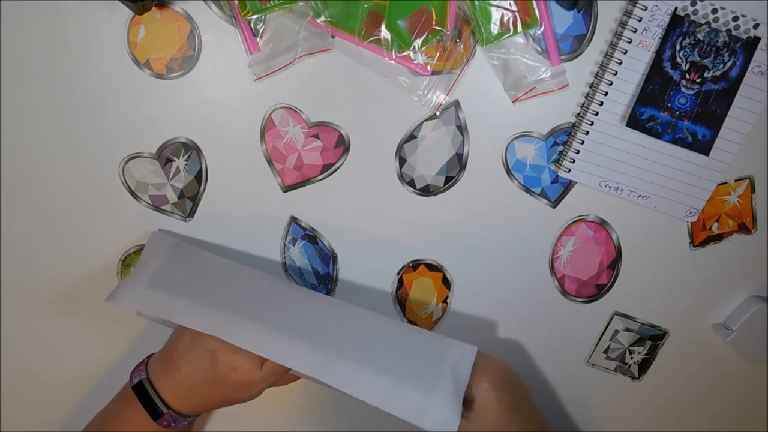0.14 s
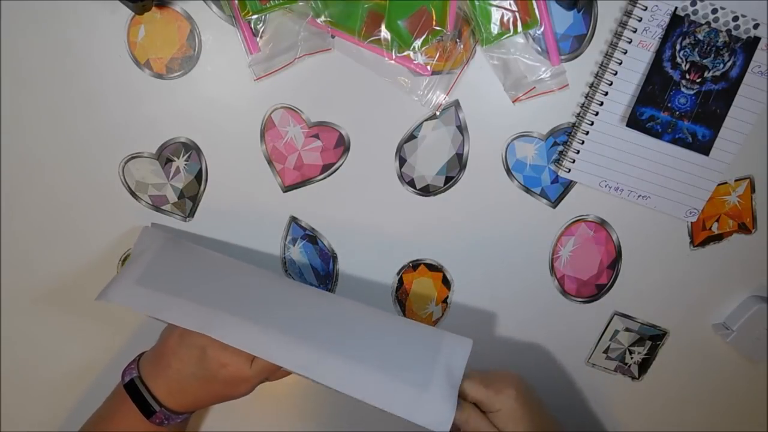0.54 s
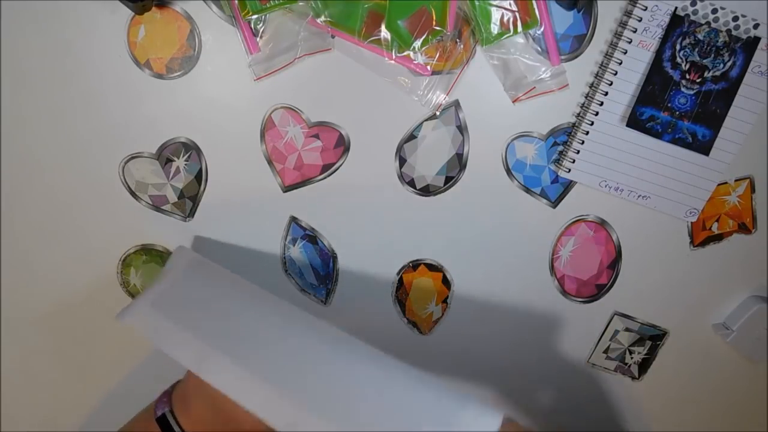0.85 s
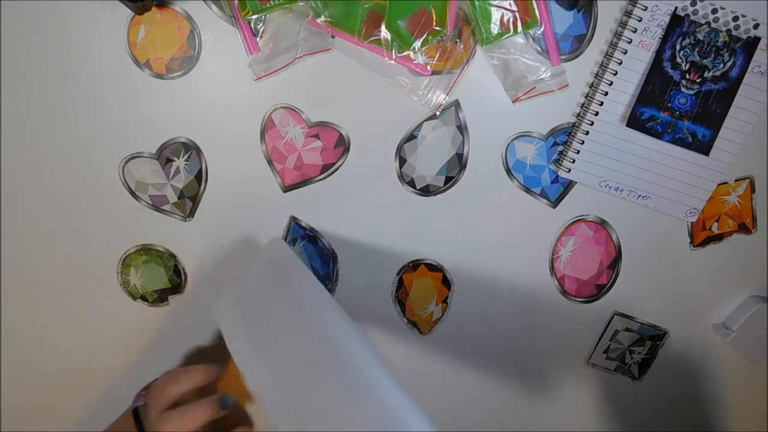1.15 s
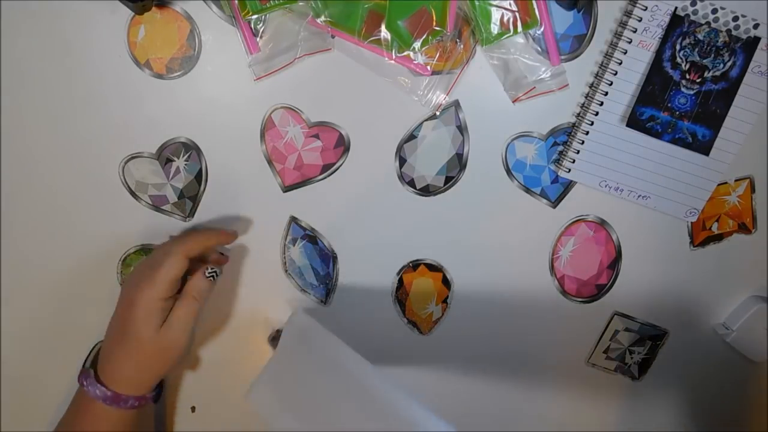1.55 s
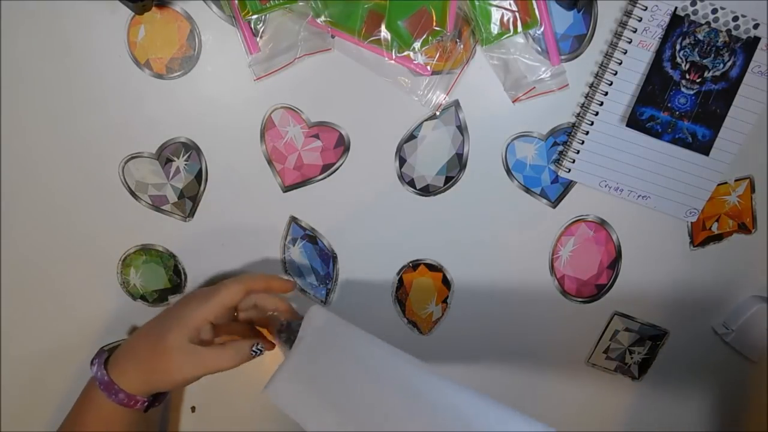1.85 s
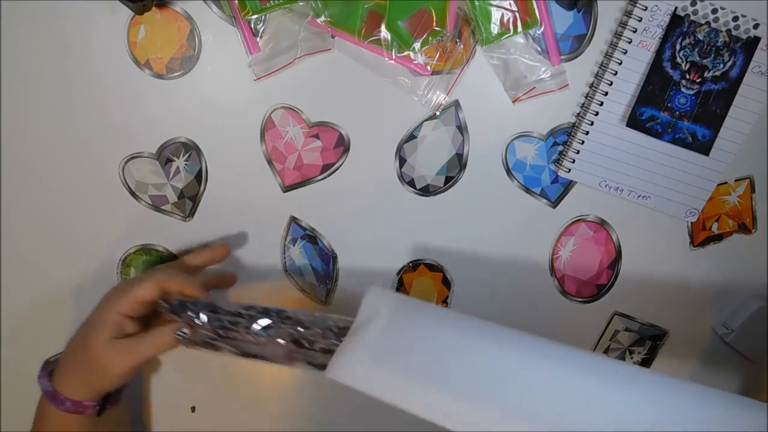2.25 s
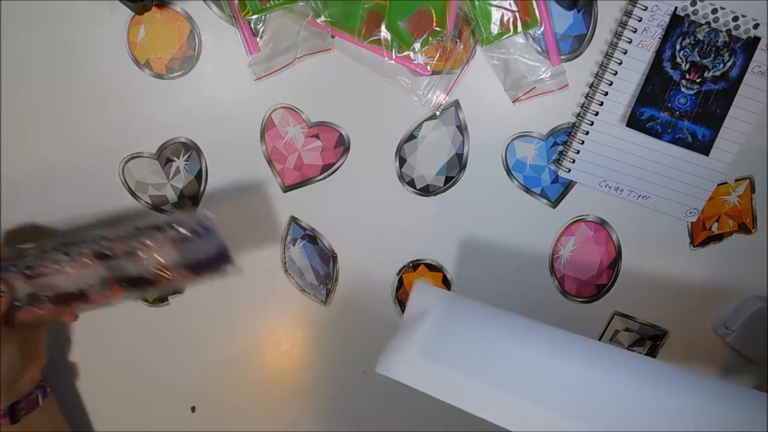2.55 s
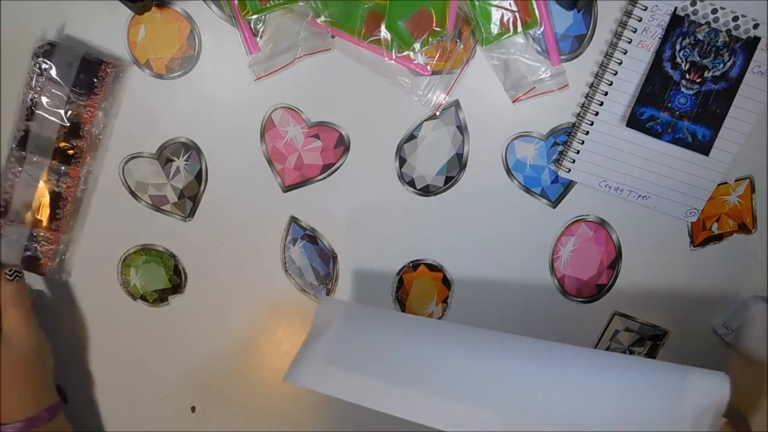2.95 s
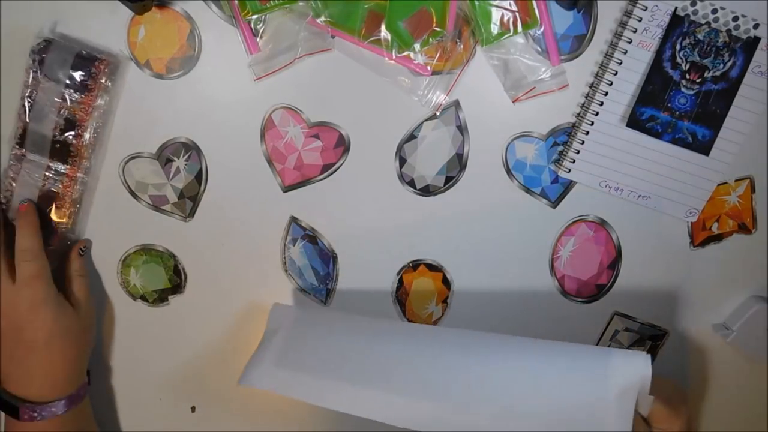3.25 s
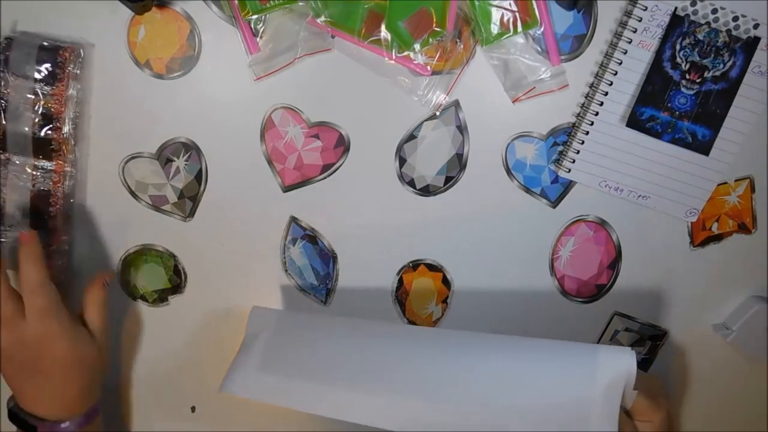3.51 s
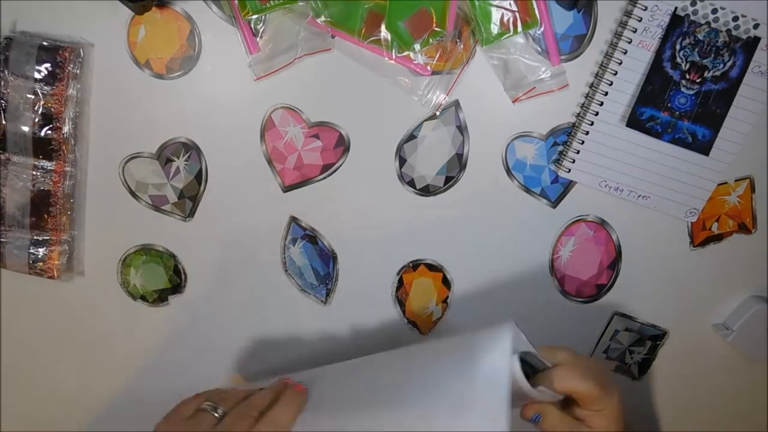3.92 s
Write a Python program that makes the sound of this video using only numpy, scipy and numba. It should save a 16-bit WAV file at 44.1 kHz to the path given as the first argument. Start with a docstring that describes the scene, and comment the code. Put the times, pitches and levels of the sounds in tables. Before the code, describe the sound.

Hands handle a rolled sheet quietly, then a plastic packet slides out with bright dense crackling, followed by separate rustles and faint table knocks.

```python
"""Crinkling plastic, paper and canvas: hands pull a packet out of a rolled craft canvas and lay it on a table.
Creases let go as swarms of tiny buckles and as single snaps, all summed from short damped sines.
The roll rings as a tube (resonated noise), the table thuds (low damped sines), a small room adds a short tail.
Behind it: steady air and hiss (shaped noise) and a wandering low rumble, heard by a stereo microphone."""
import sys
import numpy as np
from scipy import signal
from scipy.fft import rfft, irfft
from scipy.io import wavfile
from scipy.ndimage import uniform_filter1d
from numba import njit

SR = 44100
rng = np.random.default_rng(int(sys.argv[2]) if len(sys.argv) > 2 else 0)


def master_out(mix):
    """Clip the mix to full scale and print it as 16-bit PCM to the path in sys.argv[1]."""
    frames = np.transpose(np.atleast_2d(mix))
    ceiling = np.clip(frames, -1, 1)
    pcm = np.round(ceiling * 32767).astype(np.int16)
    wavfile.write(sys.argv[1], SR, pcm)


N = 179783

# sheet materials: low edge f/Hz, high edge f/Hz, rustle pitch scatter/oct, mean ring T60/cycles,
# rustle trim/dB, snap trim/dB, snap pitch scatter/oct, share of left-right balance (treble is shadowed more)
CANVAS = (486, 1091, 0.31, 8.5, -3, -1, -0.05, .4)
PAPER = (906, 4609, 0.63, 8.5, -2.7, 0.5, 0.5, 1.05)
FILM = (3804, 17000, 1.37, 7, -2.8, -.5, 2.2, 1.6)
# canvas, paper, film: order of the short per-material tuples; MOVES and SNAPS name their own columns
MATERIALS = (CANVAS, PAPER, FILM)
# hold of roll and packet: t/s, canvas f/Hz, film f/Hz, lowest air mode of roll f/Hz, left minus right level/dB
HOLD = [(0, 720, 6500, 325, -2), (.8, 800, 7500, 340, -2.5), (1.45, 790, 6800, 400, -2.5),
        (2.0, 700, 6000, 393, -2.5), (2.45, 660, 8000, 373, -2.5), (2.75, 870, 8200, 370, -3),
        (3.3, 930, 8300, 375, -2.5), (3.7, 900, 8200, 380, -2), (3.95, 690, 7700, 370, -1)]
CREASES_PER_S = (600, 1500, 2500)
CREASE_SCATTER_DB, CREASE_MOST_DB = 1, 8


def rustle():
    """Swarm of small creases per material, many small and few large, scaled by the handling level."""
    levels_db, paper_hz = handling()
    canvas_hz, film_hz, _, pan_db = curves(HOLD)
    out = 0
    for material, rate, level_db, hz in zip(MATERIALS, CREASES_PER_S, levels_db, (canvas_hz, paper_hz, film_hz)):
        u = rng.random((int(rate * N / SR), 2))
        start = u[:, 0] * (N - 1)
        i = start.astype(int)
        size_db = np.minimum(-CREASE_SCATTER_DB * np.log(1 - u[:, 1]), CREASE_MOST_DB)
        spread_ms = np.full(len(i), .6)
        swarm = buckles(start, size_db, hz[i], pan_db[i], spread_ms, material, material[2], count=2)
        out = out + unit(swarm) * undb(level_db + material[4])
    return out


# loudest single snaps, levels before trim: t/s, film level/dB, paper level/dB, canvas level/dB, paper f/Hz
SNAPS = [(0.1246, -40, -47, -59, 1340), (0.4319, -46, -62, -58, 1540), (0.6604, -41, -41, -41, 2060),
         (0.6809, -27, -60, -55, 1930), (0.9408, -33, -50, -44, 1360), (0.9574, -35, -30.5, -33, 1270),
         (1.045, -32, -50, -42, 2110), (1.1952, -45, -35, -43.5, 3000), (1.4214, -33, -30, -28.5, 1500),
         (1.4471, -23.5, -27, -29, 1390), (1.476, -21.5, -32.5, -41, 2220), (1.6068, -20, -52, -49, 2100),
         (1.7325, -30.5, -26, -34, 1430), (1.7833, -32.5, -33.5, -47, 1370), (1.8274, -47, -36, -39, 1380),
         (1.928, -37, -38, -34, 1600), (1.9414, -50, -34, -47, 1870), (1.9749, -21, -28, -43, 2700),
         (2.0338, -24, -36, -46, 2410), (2.0534, -36, -37, -42, 1150), (2.1044, -24, -33.5, -58, 2630),
         (2.1475, -33, -34, -52, 2170), (2.1735, -31, -36, -49, 1800), (2.2104, -16, -30, -36, 2120),
         (2.2804, -25, -34, -36, 1940), (2.288, -16, -30, -37, 1340), (2.3052, -12.5, -31, -47, 1050),
         (2.3254, -18, -38, -34, 1180), (2.3456, -22, -36, -38, 3070), (2.3614, -17, -49, -56, 1180),
         (2.3754, -19, -31, -50, 2690), (2.3984, -22.5, -33, -36, 3230), (2.4608, -35, -42, -61, 2770),
         (2.4783, -35, -34, -61, 2920), (2.495, -22.5, -37, -75, 1450), (2.59, -30, -43, -68, 1720),
         (2.6039, -22.5, -40, -49, 3200), (2.6962, -33, -50, -51, 1330), (2.7327, -26, -51, -46.5, 1700),
         (2.7684, -31, -33, -34.5, 1740), (2.8016, -25.5, -31, -51, 1790), (2.828, -19.5, -23, -19, 1010),
         (2.8374, -21, -25, -26.5, 2780), (2.8954, -41, -37, -42, 1590), (2.9858, -35, -42, -36, 1580),
         (3.0071, -30, -34, -33, 1120), (3.0154, -30, -26, -42, 1150), (3.0544, -26, -27.5, -52, 1900),
         (3.0814, -18.5, -50, -57, 1040), (3.1288, -27, -29, -68, 1820), (3.243, -28, -32, -34, 1470),
         (3.2615, -16.5, -23.5, -35, 2440), (3.2799, -15.5, -25.5, -45, 1090),
         (3.3174, -36, -38, -33.5, 1020), (3.3483, -32, -55, -61, 1350), (3.4111, -40, -45, -54, 1730),
         (3.479, -36, -53, -58, 1940), (3.5296, -21, -28, -35, 2480), (3.5444, -36, -35, -36, 1330),
         (3.5969, -18, -30.5, -61, 1700), (3.6905, -22, -27, -55, 1546), (3.7973, -45.5, -57, -68, 1050),
         (3.91, -46, -46, -43, 1480), (3.9414, -37, -41, -40, 1920), (3.9496, -23.5, -29, -47, 1730)]
SNAP_SPREAD_MS = (1.6, 1.9, 1.3)
SNAP_PAN_SCATTER_DB = 2.5
SNAP_FILM_HZ = 10260  # film snaps lean towards this, brighter than the rustle
SMALL_SNAPS, SMALL_OCTAVES = 80, 1.2  # count, full pitch range
SMALL_SNAP_DB, SMALL_SCATTER_DB = (2, 3, 9), 4  # above the handling level before trim, +- scatter


def snaps():
    """Larger creases let go in bursts of rings that shake all three materials; small ones fall at random."""
    levels_db, paper_hz = handling()
    canvas_hz, film_hz, _, pan_db = curves(HOLD)
    s, film_db, paper_db, canvas_db, pitch_hz = np.transpose(SNAPS)
    small = rng.random((SMALL_SNAPS, 5))
    k = (small[:, 0] * (N - 1)).astype(int)
    small_hz = paper_hz[k] * 2 ** (SMALL_OCTAVES * (small[:, 4] - .5))
    s, pitch_hz = np.r_[s, k / SR], np.r_[pitch_hz, small_hz]
    j = (s * SR).astype(int)
    snap_pan_db = pan_db[j] + SNAP_PAN_SCATTER_DB * rng.standard_normal(len(s))
    centres_hz = (canvas_hz[j], pitch_hz, np.sqrt(SNAP_FILM_HZ * film_hz[j]))
    out = 0
    for material, level_db, large_db, hz, above_db, luck, spread_ms in zip(
            MATERIALS, levels_db, (canvas_db, paper_db, film_db), centres_hz,
            SMALL_SNAP_DB, small[:, 1:4].T, SNAP_SPREAD_MS):
        small_db = level_db[k] + above_db + SMALL_SCATTER_DB * 2 * (luck - .5)
        snap_db = np.r_[large_db, small_db] + material[5]
        spread_ms = np.full(len(s), spread_ms)
        out = out + buckles(s * SR, snap_db, hz, snap_pan_db, spread_ms, material, material[6], count=24)
    return out


def crinkle():
    """Rustle plus snaps, high-passed because thin sheets radiate little bass."""
    return signal.sosfilt(signal.butter(4, 505, "high", fs=SR, output="sos"), rustle() + snaps())


# hand movements, each a swell of rustle, before trim and steepness: peak t/s, paper level/dB,
# hollow canvas level/dB, plastic film level/dB, paper f/Hz, rise/(s per first 20 dB), fall/(s per first 20 dB)
MOVES = [(0.0, -45.5, -52, -52, 1900, .1, .065), (0.1, -58, -58, -66, 1400, .2, .3),
         (0.29, -57, -62, -66, 1400, .1, .15), (0.39, -58, -59, -65, 1300, .15, .2),
         (0.51, -58, -61, -65, 1700, .15, .3), (0.675, -46, -51, -46.5, 1680, .085, .09),
         (0.76, -55, -61, -64, 1500, .1, .2), (0.87, -51, -57, -57, 1500, .15, .2),
         (0.975, -44, -51, -50, 1400, .12, .2), (1.07, -49.5, -57, -53, 2060, .2, .17),
         (1.225, -49, -56, -57, 1870, .045, .3), (1.36, -45.5, -58, -48, 2100, .25, .2),
         (1.44, -35.5, -39.5, -40.5, 1650, .1, .08), (1.61, -53, -59, -54, 1850, .2, .25),
         (1.74, -42, -51, -52, 1600, .03, .15), (1.8, -42, -54, -58, 1330, .08, .06),
         (1.935, -49, -55, -62, 1890, .015, .1), (1.99, -39.5, -53, -47, 2280, .07, .09),
         (2.055, -47, -52, -56, 1400, .04, .05), (2.11, -47, -59, -53, 2390, .04, .2),
         (2.21, -39, -44, -41, 1860, .14, .12), (2.32, -36.5, -44, -41, 1950, .14, .15),
         (2.41, -40, -43, -47, 2230, .12, .04), (2.49, -47, -62, -51, 2650, .08, .11),
         (2.6, -49, -57, -47.5, 2300, .12, .14), (2.75, -45.5, -52, -45, 1860, .14, .12),
         (2.833, -28, -33.5, -28, 1620, .016, .075), (2.9, -44, -56, -49, 1750, .08, .13),
         (3.03, -35, -43, -42, 1650, .075, .09), (3.1, -48, -58, -44, 2050, .15, .09),
         (3.25, -39, -45, -43, 1470, .012, .08), (3.29, -40.5, -44, -44, 1800, .06, .085),
         (3.39, -55, -63, -59, 1700, .1, .15), (3.54, -37, -44, -42, 1770, .06, .11),
         (3.69, -54, -69, -55, 1720, .015, .12), (3.96, -44, -44.5, -46, 1800, .055, .8)]
STEEPNESS = (1.1, .95, 1.1)  # canvas, paper, film: divides rise and fall times


def handling():
    """Rustle level/dB of canvas, paper and film, and paper pitch/Hz led by the strongest movement."""
    s, paper_db, canvas_db, film_db, hz, rise_s, fall_s = np.transpose(MOVES)
    power = [swells(s, db, rise_s / k, fall_s / k) for db, k in zip((canvas_db, paper_db, film_db), STEEPNESS)]
    pitch_hz = np.exp(np.log(hz) @ power[1] / power[1].sum(axis=0))
    return [fine(10 * np.log10(p.sum(axis=0))) for p in power], fine(pitch_hz)


# hands work further from the left port later on: t/s, left lag/ms
LAG = [(0, 0.012), (2, 0.025), (3, 0.074), (4.08, 0.083)]
PAN_SCATTER_DB, LAG_SCATTER_MS = 3.5, 0.043


def buckles(start, db, centre_hz, pan_db, spread_ms, material, octaves, count):
    """Each crease lets go as count short rings, each from its own spot, so with its own balance and lag."""
    lo_hz, hi_hz, _, cycles = material[:4]
    shape = (len(start), count, 3)
    u, g = rng.random(shape), rng.standard_normal(shape)
    hz = centre_hz[:, None] * 2 ** (octaves * g[..., 2])
    hz = np.minimum(np.maximum(hz, lo_hz ** 2 / hz), hi_hz ** 2 / hz)  # folded back at the edges
    hz = np.clip(hz, lo_hz / 2, hi_hz)
    late = -np.log(1 - u[..., 0])
    right = start[:, None] + spread_ms[:, None] * late * SR / 1000
    # high rings are short: start larger for the same energy
    size = undb(db)[:, None] * np.sqrt(hz / centre_hz[:, None])
    size = size * np.exp(-.4 * late) * np.sign(u[..., 1] - .5)
    t60 = cycles * (.5 + u[..., 2]) / hz
    pan = undb((material[7] * pan_db[:, None] + PAN_SCATTER_DB * g[..., 0]) / 2)
    lag_ms = np.interp(start / SR, *np.transpose(LAG))[:, None] + LAG_SCATTER_MS * g[..., 1]
    left = right + lag_ms * SR / 1000
    return np.array([ring(left.ravel(), hz.ravel(), t60.ravel(), (size * pan).ravel(), count=N),
                     ring(right.ravel(), hz.ravel(), t60.ravel(), (size / pan).ravel(), count=N)])


# swells of the roll's lowest air mode: peak t/s, level/dB, rise/(s per first 20 dB), fall/(s per first 20 dB)
TUBE_SWELLS = [(.65, -72, 1.2, .5), (1.82, -64, .1, .07), (1.94, -65, .03, .06), (2.06, -63, .08, .07),
               (2.2, -66, .1, .07), (2.38, -64, .06, .07), (2.51, -66, .1, .08), (2.86, -62, .05, .06),
               (3.02, -62, .05, .08), (3.53, -70, .08, .08), (4.0, -77, .2, 1.5)]
# packet scraping inside the roll sounds its next mode:
# peak t/s, level/dB, rise/(s per first 20 dB), fall/(s per first 20 dB)
HOLLOW_SWELLS = [(.4, -67, .2, 1.3), (1.94, -51, .025, .05), (2.31, -42, .09, .15), (2.41, -40, .13, .045),
                 (3.97, -53, .06, 3)]
HOLLOW_HZ, TUBE_WIDTH_HZ = 652, 23


def tube():
    """Air column of the roll: noise through two band-passes at each of its two lowest modes."""
    balance = undb(np.array([[-.7], [.7]]))
    out = 0
    for hz, table in ((curves(HOLD)[2], TUBE_SWELLS), (np.full(N, 1. * HOLLOW_HZ), HOLLOW_SWELLS)):
        air = svf(svf(rng.standard_normal(N), hz, TUBE_WIDTH_HZ), hz, 2 * TUBE_WIDTH_HZ)
        level = fine(np.sqrt(swells(*np.transpose(table)).sum(axis=0)))
        out = out + unit(air) * level * balance
    return out


# table thuds, before trim: t/s, level/dB, f/Hz, T60/s
THUDS = [(1.447, -60, 202, 0.068), (1.6, -55.5, 190, 0.077), (2.308, -63, 205, 0.12),
         (2.822, -45, 102, 0.12), (3.01, -55, 61.9, 0.11), (3.077, -64, 248, 0.072),
         (3.259, -59.5, 136, 0.12), (3.281, -55.5, 106, 0.14), (3.53, -62, 61.9, 0.13),
         (3.948, -58, 113, 0.12)]


def thuds():
    """Table top answers each landing with a low ring and a shorter overtone."""
    s, db, hz, t60 = np.transpose(THUDS)
    low = ring(s * SR, hz, t60, undb(db - 1), count=N)
    overtone = ring(s * SR, 1.9 * hz, .5 * t60, undb(db - 2.0), count=N)
    return low + overtone


ROOM_T60_S, ROOM_DB, ROOM_GAP_S = 0.2, -3.5, 0.00067  # gap: time constant of the tail's onset


def room(dry, count=10):
    """Table and walls: dense decaying noise tail, alike left and right in the bass, crossfading between draws."""
    t = np.arange(int(.3 * SR)) / SR
    fade = (1 - np.exp(-t / ROOM_GAP_S)) * undb(-60 * t / ROOM_T60_S)
    place, out = np.linspace(0, count - 1, N), np.zeros((2, N))
    for k in range(count):
        mid, side = rng.standard_normal((2, len(t)))
        side = signal.lfilter(*signal.butter(2, 1500, "high", fs=SR), side)
        tail = (mid + side * np.array([[1], [-1]])) * fade
        tail = tail / np.linalg.norm(tail, axis=1)[:, None]
        near = np.flatnonzero(np.abs(place - k) < 1)
        part = dry[:, near] * np.cos(np.pi / 2 * (place[near] - k))
        wet = signal.fftconvolve(part, tail, axes=1)[:, :N - near[0]]
        out[:, near[0]:near[0] + wet.shape[1]] += wet
    return undb(ROOM_DB) * out


# room air spectrum shape: f/Hz, relative density level/dB
AIR = [(15, -38), (25, -8), (80, -2.5), (120, -2), (250, -7), (500, -2.5), (1000, 0.5), (2000, -8),
       (4000, -11.5), (8000, -20), (16000, -20.5)]
AIR_DB = -62.5  # total rms


def air_hiss():
    """Steady room air and microphone hiss: spectrum-shaped noise, wider in the treble."""
    hz = np.maximum(np.arange(N // 2 + 1) * SR / N, 20)
    mid, side = irfft(rfft(rng.standard_normal((2, N))) * undb(colour_db(AIR, hz)), N)
    side = 0.54 * side + signal.lfilter(*signal.butter(1, 900, "high", fs=SR), side)
    return unit(mid + side * np.array([[1], [-1]])) * undb(AIR_DB)


# low rumble of the house: t/s, gain level/dB
RUMBLE = [(0.0, -81), (1.04, -66), (1.15, -71), (1.6, -72), (2.1, -78), (4.08, -82)]
RUMBLE_FOLLOW_DB = -32  # relative to the canvas handling level


def rumble():
    """44 Hz tone of wandering phase plus 49 Hz noise bands; also rises with handling of the canvas."""
    centre_hz = np.full(N, 49.)
    low = [unit(svf(svf(rng.standard_normal(N), centre_hz, 20.0), centre_hz, 43.0)) for _ in range(2)]
    phase = 2 * np.pi * 44.0 * np.arange(N) / SR + 2.2 * uniform_filter1d(low[1], SR // 8)
    hum = 0.63 * np.sin(phase)
    canvas_db = handling()[0][0]
    gain = np.hypot(undb(curves(RUMBLE)[0]), undb(canvas_db + RUMBLE_FOLLOW_DB))
    return (hum + 0.4 * low[0] + 0.15 * low[1] * np.array([[1], [-1]])) * gain


@njit
def ring(start, hz, t60, size, count):
    """Sum of damped sines that begin at fractional samples and swell over about half a cycle."""
    out = np.zeros(count)
    for k in range(len(start)):
        i = int(np.ceil(start[k]))
        s = (2j * np.pi * hz[k] - np.log(1000) / t60[k]) / SR
        q = np.exp(-2 * hz[k] / SR)
        p = np.exp(s)
        z = size[k] * np.exp(s * (i - start[k]))
        a = q ** (i - start[k])
        for n in range(max(i, 0), min(i + int(.6 * t60[k] * SR) + 1, count)):
            out[n] += z.imag * (1 - a)
            z *= p
            a *= q
    return out


@njit
def svf(x, hz, width):
    """State-variable band-pass with a moving centre."""
    y, b, l = np.empty(len(x)), 0., 0.
    for i in range(len(x)):
        g, k = np.tan(np.pi * hz[i] / SR), width / hz[i]
        v = (b + g * (x[i] - l)) / (1 + g * (g + k))
        b, l, y[i] = 2 * v - b, l + 2 * g * v, k * v
    return y


STEP = 32  # samples per control value
SWELL_BEND = 1.4  # above 1 the flanks steepen away from the peak


def swells(s, db, rise_s, fall_s):
    """Power of each swell over time: climbs to its peak and drops away ever faster, down to -140 dB."""
    t = np.arange(0, N, STEP) / SR - s[:, None]
    away = np.where(t < 0, -t / rise_s[:, None], t / fall_s[:, None])
    level_db = np.maximum(db[:, None] - 20 * away ** SWELL_BEND, -140)
    return undb(2 * level_db)


def fine(x):
    """Control values held up to the sample rate."""
    return np.repeat(x, STEP)[:N]


def curves(table):
    """Columns interpolated over the time column, per sample."""
    s, *columns = np.transpose(table)
    return [np.interp(np.arange(N) / SR, s, c) for c in columns]


def colour_db(table, hz):
    """Spectrum read on a log-frequency axis."""
    table_hz, db = np.transpose(table)
    return np.interp(np.log(hz), np.log(table_hz), db)


def undb(db):
    """Amplitude from dB."""
    return 10 ** (np.asarray(db) / 20)


def unit(x):
    """Scaled to rms 1."""
    return x / np.sqrt(np.mean(x ** 2))


def scene():
    """Sheets with their room tail, then roll, table and background."""
    sheets = crinkle()
    return sheets + room(sheets) + tube() + thuds() + air_hiss() + rumble()


# microphone colour: f/Hz, level/dB
COLOUR = [(300, 6.5), (500, 0.5), (800, -1.5), (1100, -1), (1600, 0.5), (2500, 2.5), (3300, 3.5),
          (4500, 1.5), (6500, 3.5), (10000, 4), (14000, 4), (17000, -7.5)]
TOP_HZ = 16000


def record(dry):
    """Microphone colours the sound a little; recorder cuts the top steeply."""
    hz = np.linspace(1, SR / 2, 257)
    gain = undb(2 * colour_db(COLOUR, hz))  # doubled dB: minimum_phase takes the square root
    taps = signal.minimum_phase(signal.firwin2(511, np.linspace(0, 1, 257), gain))
    coloured = signal.fftconvolve(dry, taps[None], axes=1)[:, :N]
    return signal.sosfilt(signal.ellip(10, .2, 80, TOP_HZ, fs=SR, output="sos"), coloured)


dry = scene()
out = record(dry)
master_out(out)
```